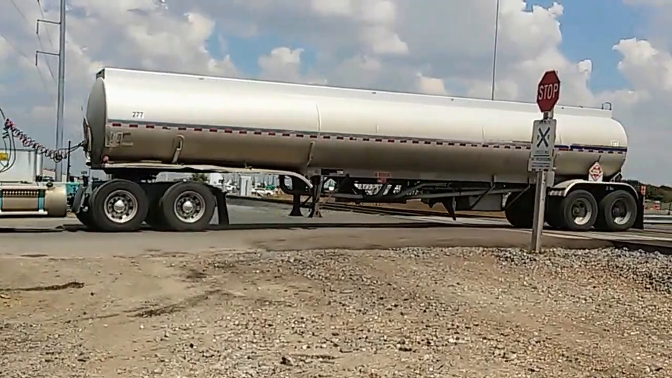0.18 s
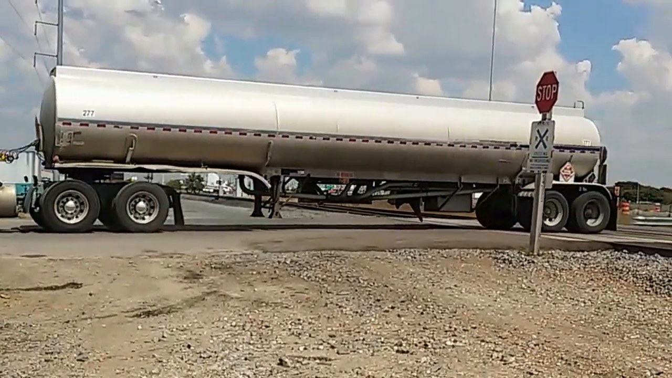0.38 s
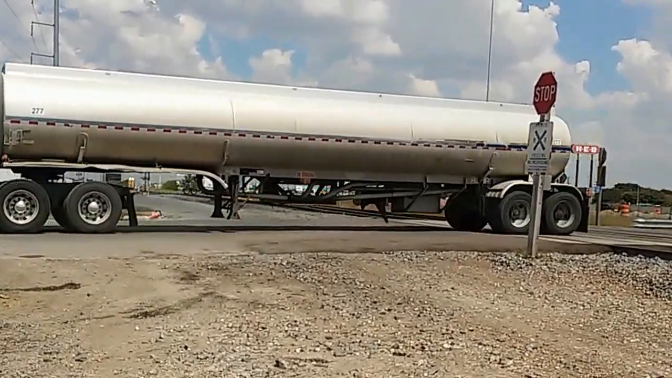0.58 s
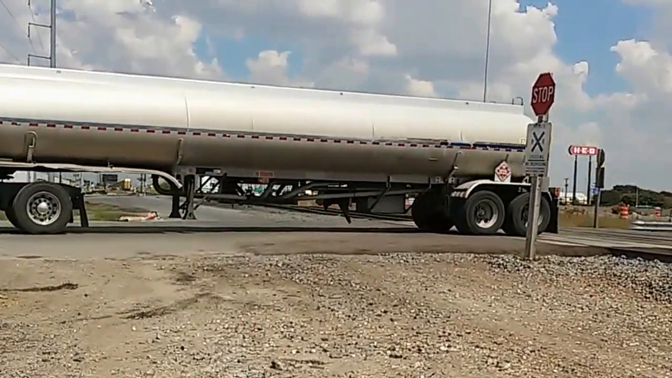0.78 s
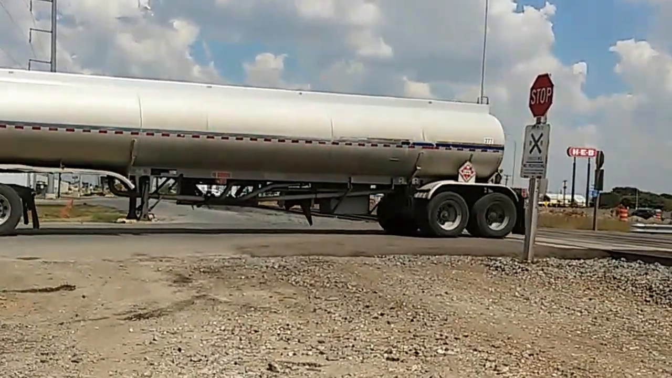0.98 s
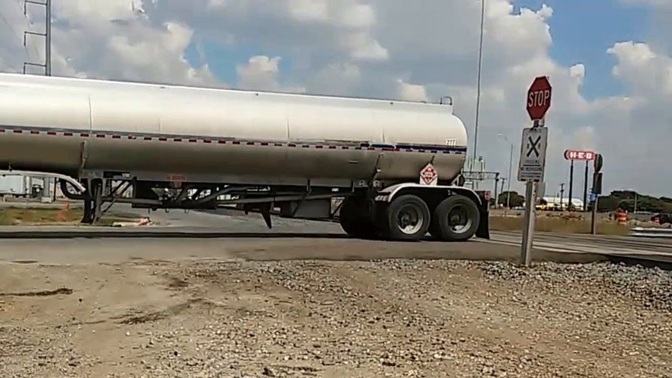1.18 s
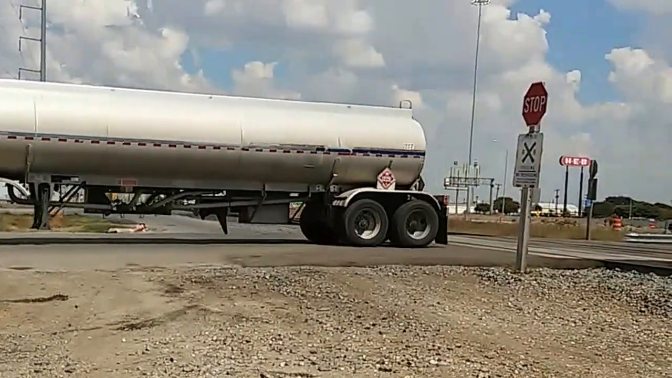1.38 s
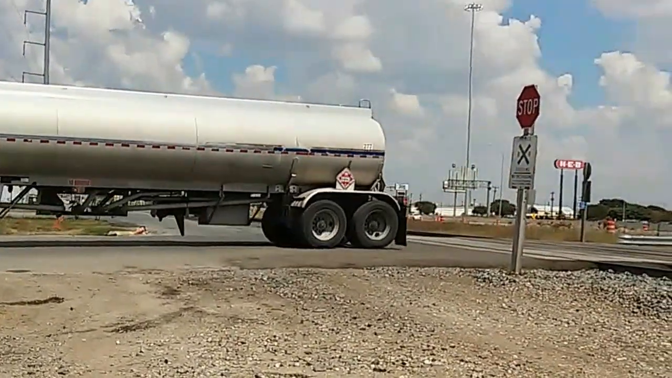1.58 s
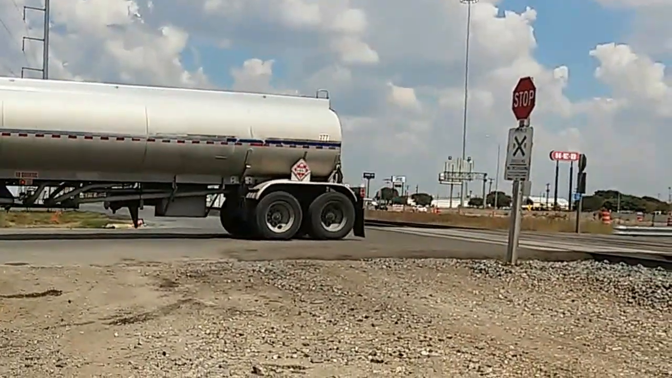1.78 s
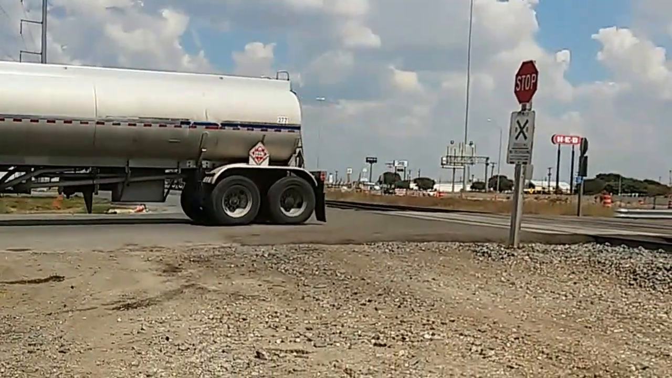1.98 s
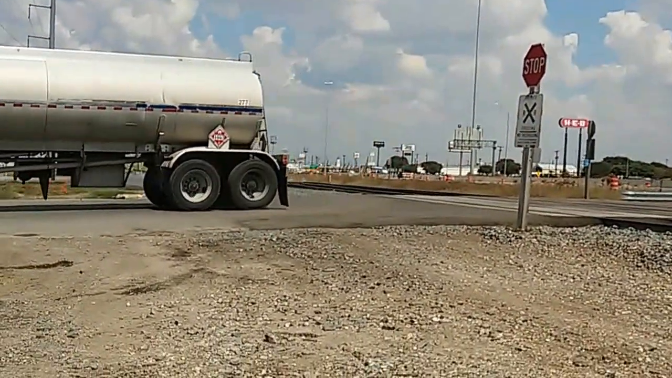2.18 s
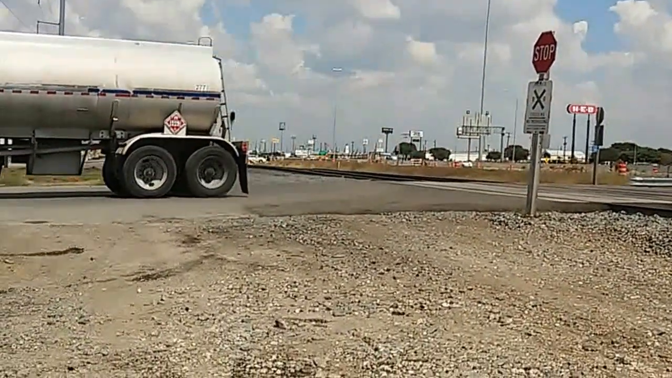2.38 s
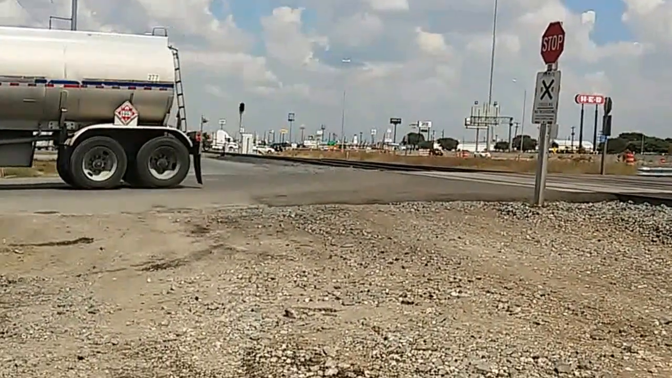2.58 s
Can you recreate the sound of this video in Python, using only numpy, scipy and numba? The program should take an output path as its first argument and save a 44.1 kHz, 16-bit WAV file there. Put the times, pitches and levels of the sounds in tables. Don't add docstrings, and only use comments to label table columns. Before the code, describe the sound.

A heavy diesel truck with a tank trailer throbs low under a thin high air hiss. At 0.2 s a very loud, bright air blast snaps open, draining away by 0.7 s. Quieter tyre roar and faint hum follow. Around 1.4 s an air puff, hiss and steel squeaks mark a bump; more puffs and squeaks come at 2.0-2.5 s as revs climb with a faint rising turbo whistle. Outdoors, mono roadside phone.

```python
import sys
import numpy as np
from scipy import signal
from scipy.io import wavfile
from scipy.ndimage import uniform_filter1d
from numba import njit

SR = 44100
rng = np.random.default_rng(int(sys.argv[2]) if len(sys.argv) > 2 else 0)


def linear_from_db(decibels):
    return 10 ** (np.asarray(decibels, float) / 20)


def persist_wave(psi):
    counts = np.round(np.clip(psi, -1, 1) * 32767).astype(np.int16)
    wavfile.write(sys.argv[1], SR, np.atleast_2d(counts).T)


N = 114660
T = np.arange(N) / SR
GUST_DB = 0.7


def unit(x):
    return x / np.sqrt(np.mean(x ** 2))


def curve(rows, axis):
    return np.interp(T, np.array(rows)[:, 0], np.array(rows)[:, axis])


def at(rows, hz):
    return np.interp(np.log(hz), np.log(np.array(rows)[:, 0]), np.array(rows)[:, 1])


@njit
def svf(x, hz, width):
    y, b, l = np.empty(len(x)), 0., 0.
    for i in range(len(x)):
        g, k = np.tan(np.pi * hz[i] / SR), width[i] / hz[i]
        v = (b + g * (x[i] - l)) / (1 + g * (g + k))
        b, l, y[i] = 2 * v - b, l + 2 * g * v, k * v
    return y


def band(x, hz, width):
    return svf(x, np.clip(hz + 0 * T, 15, .45 * SR), width + 0 * T)


def noise_band(hz, first_width, second_width):
    once = band(rng.standard_normal(N), hz, first_width)
    return unit(band(once, hz, second_width))


def walk(rate):
    hold = int(SR / rate)
    steps = np.repeat(rng.standard_normal(N // hold + 1), hold)
    return 1.29 * uniform_filter1d(uniform_filter1d(steps, hold), hold)[:N]


def hiss(colour, flicker_db, extra_db=lambda hz: 0):
    out, power = 0, 0
    octaves = np.log2(colour[-1][0] / colour[0][0])
    for hz in colour[0][0] * 2 ** np.arange(0, octaves + .1, 1 / 3):
        noise = noise_band(hz, hz / 3, hz / 3)
        gain = linear_from_db(at(colour, hz)) * np.sqrt(hz)
        out = out + gain * linear_from_db(flicker_db * walk(14) + extra_db(hz)) * noise
        power = power + gain ** 2
    return out / np.sqrt(power)


def rings(modes):
    return sum(linear_from_db(db + 2 * walk(30.31)) * noise_band(hz, width, 1.14 * width) for hz, width, db in modes)


def road_wash():
    # frequency in Hz, level in dB per Hz.
    road = [(16, -10), (40, -14.5), (150, -1), (500, -12), (1300, -10), (2700, -13.5), (5000, -21),
            (15500, -40.5)]
    # frequency in Hz, width in Hz, level in dB.
    tread = [(1115, 300, -7), (1620, 260, -13), (1980, 320, -4), (2420, 300, -13), (2730, 170, -12),
             (3730, 130, -23)]
    # time in seconds, roar in dB, tread in dB, brightness in dB per octave.
    near = [(0, -38, -43, 0), (.2, -43, -37, 5), (.5, -47.5, -43, 10), (.82, -44.5, -44.5, 2.5),
            (1.05, -45.5, -43.5, 4), (1.25, -42.5, -45, 0.5), (1.45, -44, -40, 5.5), (1.63, -42, -40, -5.5),
            (1.8, -43.5, -41.5, -1.5), (1.96, -43.5, -43, -1.5), (2.2, -44, -47, 0.5),
            (2.37, -45, -46, -5.5), (2.6, -44.5, -45.5, -5)]

    def brightness_db(hz):
        return curve(near, axis=3) * np.clip(np.log2(hz / 2200), 0, 1.5)

    roar = hiss(road, 1.9, brightness_db)
    wash = linear_from_db(curve(near, axis=1)) * roar + linear_from_db(curve(near, axis=2)) * rings(tread)
    dip = 0.5 * band(wash, 3170, 450)
    return wash - dip


def tread_hum():
    # time in seconds, frequency in Hz, level in dB.
    hum_track = [(.6, 163, -53), (.72, 166.5, -58), (.82, 172, -47), (.95, 172, -47), (1.05, 171.9, -58),
                 (1.17, 174.1, -51), (1.33, 177, -39), (1.42, 184, -44), (1.6, 185.7, -47.5),
                 (1.8, 189, -51), (1.9, 182, -53), (2.1, 186, -55)]
    fade_s = 0.17
    fade = np.clip((T - .45) / fade_s, 0, 1) * np.clip((2.25 - T) / fade_s, 0, 1)
    hz = curve(hum_track, axis=1) * (1 + .004 * walk(20))
    return 1.19 * fade * linear_from_db(curve(hum_track, axis=2)) * np.sin(2 * np.pi * np.cumsum(hz) / SR)


def leak():
    # time in seconds, level in dB, centre in Hz.
    leak_track = [(0, -33.5, 10950), (.07, -33.5, 10700), (.2, -41, 10900), (.6, -43, 10000),
                  (.72, -43.5, 10400), (.82, -52.5, 10400), (.88, -46, 10350), (1.08, -47.5, 10560),
                  (1.21, -56.5, 10970), (1.28, -52.5, 11000), (1.31, -44.5, 10800), (1.45, -37.5, 10850),
                  (1.62, -44, 10800), (1.8, -46, 11100), (1.9, -51.5, 11360), (1.98, -61, 11200),
                  (2.2, -55.5, 10900), (2.6, -56.5, 10670)]
    # time in seconds, width in Hz.
    leak_width = [(0, 1800), (.2, 2000), (.5, 3300), (1.25, 3300), (1.45, 2600), (2.6, 2800)]
    hz, width = curve(leak_track, axis=2), curve(leak_width, axis=1)
    core = noise_band(hz, width, width)
    skirt = unit(band(rng.standard_normal(N), hz, 6400))
    return linear_from_db(curve(leak_track, axis=1) + .9 * walk(60.3)) * (core + linear_from_db(-3) * skirt)


def turbo():
    # time in seconds, whistle frequency in Hz, level in dB.
    spool = [(1.75, 7950, -78), (1.92, 8250, -64), (2.15, 8850, -61), (2.4, 9500, -65), (2.6, 10100, -70)]
    hz, air = curve(spool, axis=1), rng.standard_normal(N)
    whistle = unit(band(air, hz, 60))
    vanes = unit(band(air, 1.47 * hz, 900))
    return linear_from_db(curve(spool, axis=2)) * (whistle + 2 * vanes)


def load_booms():
    # time in seconds, frequency in Hz, level in dB, rise in seconds, fall in seconds.
    surges = [
        (.0, 210, -36, 0.012, 0.027),
        (.57, 70.5, -48, 0.024, .04),
        (2.45, 209.3, -48, 0.11, 0.094),
        (0.152, 68, -32, 0.013, 0.01),
        (.28, 381, -42, 0.023, 0.023),
        (1.62, 364, -48, 0.026, 0.048),
        (1.8, 360, -50, 0.044, .04),
        (1.4, 215, -52, .1, .1),
        (2.555, 350, -39, 0.027, 0.024),
        (2.57, 172, -39.5, 0.028, .06),
    ]
    out = 0
    for start, hz, db, rise, fall in surges:
        swell = np.exp(-((T - start) / np.where(T < start, rise, fall)) ** 2)
        out = out + linear_from_db(db) * swell * np.sin(2 * np.pi * hz * T + .5 * walk(44))
    return out


def engine():
    # time in seconds, firing rate in Hz.
    revs = [(0, 64), (.2, 63), (.6, 65), (.9, 66.5), (1.15, 66), (1.35, 70), (1.76, 75.5), (2.0, 78.5),
            (2.2, 80.5), (2.4, 85), (2.6, 88)]
    # time in seconds, rough level in dB, first harmonic in dB, second harmonic in dB.
    engine_levels = [(0, -59, -53, -52), (.15, -52, -50, -47.5), (.3, -52, -58, -50.5),
                     (.6, -53, -54, -49.5), (.9, -50, -53, -50.5), (1.2, -55, -51.5, -53.5),
                     (1.4, -56, -49, -53), (1.75, -61, -53, -66), (2, -59, -53, -63),
                     (2.25, -56, -57.5, -52), (2.42, -55, -51.5, -64), (2.6, -53, -57, -48)]
    # frequency in Hz, width in Hz, level in dB.
    pipe_modes = [(79, 24, -5), (106, 9.4, -14.5), (132, 20, -18.5), (208.6, 21, -8)]
    phase = np.cumsum(curve(revs, axis=1) * (1 + .008 * walk(24.7))) / SR
    firing = phase.astype(int)
    scatter_db = 1.6 * np.clip(rng.standard_normal(400), -2, 2)
    lump_db = 2 * (np.arange(400) % 2)
    size = linear_from_db(scatter_db + lump_db)[firing]
    pulses = size * (np.diff(firing, prepend=0) > 0)
    pipe = sum(linear_from_db(db) * unit(band(band(pulses, hz, width), hz, 2 * width)) for hz, width, db in pipe_modes)
    decay = np.exp(-(phase % 1) / .4)
    clatter = unit(size * decay * band(rng.standard_normal(N), 2000, 1100))
    rough = linear_from_db(curve(engine_levels, axis=1)) * (linear_from_db(-4) * pipe + linear_from_db(-10) * clatter)
    drone = sum(np.sqrt(2) * linear_from_db(curve(engine_levels, axis=1 + order) - 1) * np.sin(2 * np.pi * order * phase)
                for order in (1, 2))
    return rough + drone


def squeaks():
    # time in seconds, frequency in Hz, level in dB, half length in seconds.
    rubs = [(1.42, 1850, -37, .04), (1.485, 1830, -41, .025), (1.56, 2800, -48, .08),
            (1.56, 3700, -47, .02), (1.59, 3950, -48, .02), (1.405, 2520, -39, .015),
            (1.44, 2820, -40, .06), (1.435, 4560, -44, .02), (1.49, 4100, -48, .04), (1.62, 1150, -44, .07),
            (1.612, 2000, -43, .015), (1.655, 1800, -44, .025), (1.84, 1500, -52, .1),
            (2.03, 4100, -46, .03), (2.1, 4000, -47, .025), (2.535, 3700, -49, .03),
            (1.785, 4600, -52, .03), (1.78, 5350, -54, .03), (2.035, 2180, -45, .02), (2.1, 2060, -43, .02),
            (2.27, 2170, -45, .035), (2.27, 3620, -50, .03), (2.43, 2130, -42, .03),
            (2.44, 3750, -44, .022), (2.47, 4200, -46, .035), (2.43, 4900, -46, .015),
            (2.475, 5250, -44, .035), (2.51, 2100, -45, .04), (.04, 2000, -43, .07), (.06, 1050, -45, .08),
            (.1, 4700, -51, .04), (1.75, 1700, -47, .06), (1.94, 1950, -46, .04), (2.22, 1250, -49, .04),
            (.55, 3350, -52, .03), (1.13, 3720, -57, .07), (1.16, 2750, -54, .06), (.78, 1600, -52, .06),
            (.8, 2400, -52, .1), (1.11, 2150, -50, .015), (2.32, 2900, -52, .04)]
    out = 0
    for start, hz, db, half in rubs:
        hush = noise_band(hz, hz / 11, hz / 11)
        tone = linear_from_db(-6) * np.sin(2 * np.pi * hz * T + walk(hz / 20))
        stutter = linear_from_db(3 * walk(90))
        out = out + linear_from_db(db) * np.exp(-((T - start) / half) ** 2) * stutter * (hush + tone)
    return out


def puff_air(puffs, colour):
    env = 0
    for start, db, rise, hold, fall in puffs:
        swell = np.clip((T - start) / rise, 0, 1) ** 1.5
        env = env + linear_from_db(db - fall * np.maximum(T - start - rise - hold, 0)) * swell
    return env * linear_from_db(GUST_DB * walk(150)) * hiss(colour, 1.2)


def trailer_springs():
    # start in seconds, level in dB, rise in seconds, hold in seconds, fall in dB per second.
    rear_puffs = [
        (1.975, -38, 0.052, 0.024, 220),
        (2.075, -38, 0.018, 0.017, 202),
        (2.232, -45, 0.011, 0.027, 201.2),
        (2.396, -38, 0.01, .02, 199.7),
        (2.41, -36.5, 0.039, 0.043, 170),
    ]
    # frequency in Hz, level in dB per Hz.
    rear_colour = [(470, -59), (800, -43), (953, -4.5), (1940, -1), (2930, -5.5), (4100, -2), (7850, -19.5),
                   (10800, -3.5), (15800, -21)]
    return puff_air(rear_puffs, rear_colour)


def tractor_springs():
    # start in seconds, level in dB, rise in seconds, hold in seconds, fall in dB per second.
    front_puffs = [
        (1.375, -37.5, 0.055, 0.062, 100),
        (1.56, -48, 0.016, 0.058, 116),
        (1.75, -46, 0.02, 0.035, 150),
    ]
    # frequency in Hz, level in dB per Hz.
    front_colour = [(470, -55), (800, -31), (929, -6), (1850, -9.5), (3450, -11), (4420, -10),
                    (7660, -19.5), (11000, -14), (15800, -21)]
    return puff_air(front_puffs, front_colour)


def blast():
    # time in seconds, level in dB.
    flow = [
        (.208, -62),
        (.214, -30.5),
        (.224, -22.5),
        (.232, -9),
        (.27, -10.5),
        (.3, -13),
        (.4, -21.5),
        (.55, -31.5),
        (.8, -66),
    ]
    # frequency in Hz, level in dB per Hz.
    jet_colour = [(180, -54), (300, -55), (665, -10), (1290, -19.5), (1740, -10), (5290, -7.5), (9000, -9),
                  (11300, 1), (15800, -7.5)]
    # frequency in Hz, power without unit.
    jet_power = [(400, 1.2), (1200, 1.4), (3000, 1.39), (7000, 1.06), (12000, 1.16)]
    # frequency in Hz, width in Hz, level in dB.
    nozzle = [(650, 180, -25), (3100, 250, -23), (4150, 380, -18.5), (5300, 450, -15.5), (6400, 400, -22),
              (7550, 300, -21), (10450, 900, -11), (11500, 1300, -8), (12350, 800, -12), (13300, 600, -14)]
    flow_db = curve(flow, axis=1)
    below_top_db = flow_db - max(db for _, db in flow)
    jet = hiss(jet_colour, 1.0, lambda hz: (at(jet_power, hz) - 1) * below_top_db)
    tones = linear_from_db(0.33 * below_top_db) * rings(nozzle)
    is_open = (T > flow[0][0]) * (T < flow[-1][0])
    return is_open * linear_from_db(flow_db + GUST_DB * walk(400)) * (jet + tones)


def scene():
    rolling = road_wash() + tread_hum()
    power_unit = turbo() + load_booms() + engine()
    air = leak() + trailer_springs() + tractor_springs() + blast()
    mono = rolling + power_unit + air + squeaks()
    mono = mono - 0.54 * band(mono, 789, 350)
    return np.array([mono, mono])


def band_limit(x):
    return signal.sosfilt(signal.butter(12, 15800, fs=SR, output="sos"), x)


def record(dry):
    clipped = np.clip(dry, -.9, .9)
    low_pass = signal.ellip(10, .2, 70, 15760, fs=SR, output="sos")
    return band_limit(signal.sosfilt(low_pass, clipped))


dry = scene()
out = record(dry)
persist_wave(out)
```